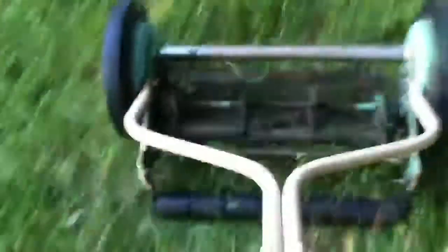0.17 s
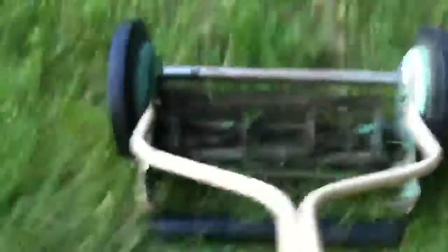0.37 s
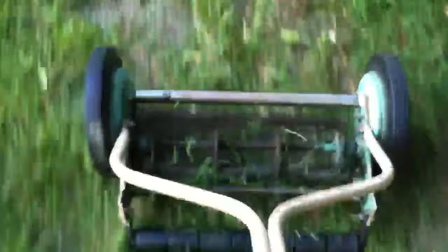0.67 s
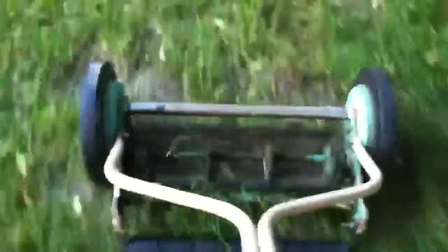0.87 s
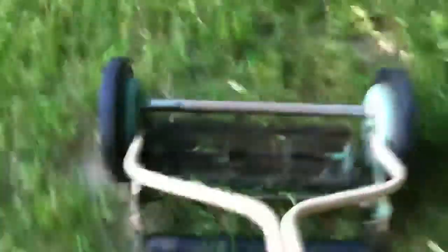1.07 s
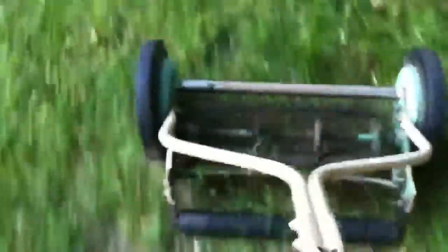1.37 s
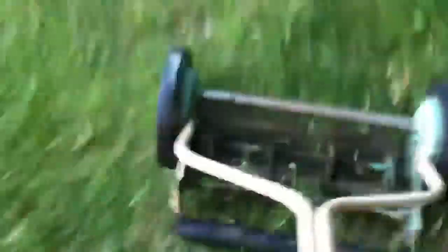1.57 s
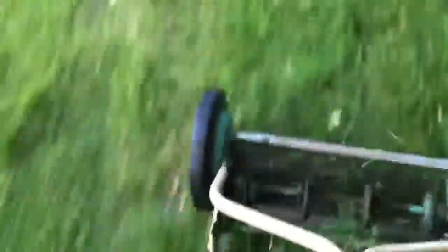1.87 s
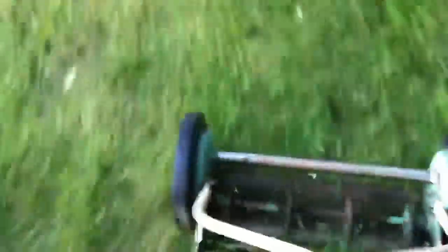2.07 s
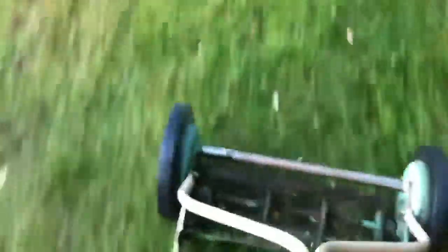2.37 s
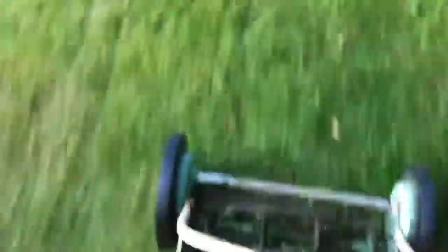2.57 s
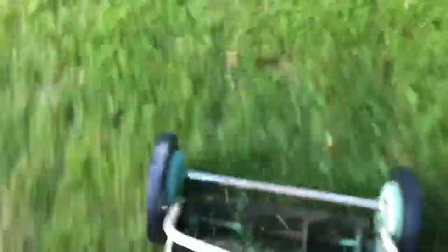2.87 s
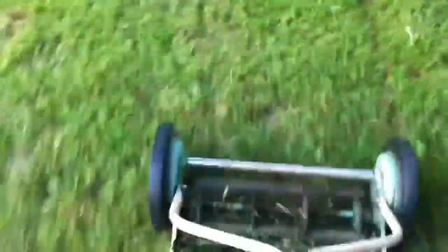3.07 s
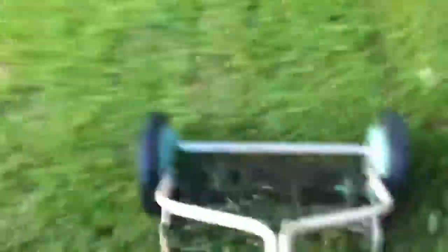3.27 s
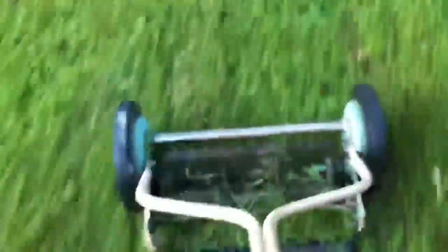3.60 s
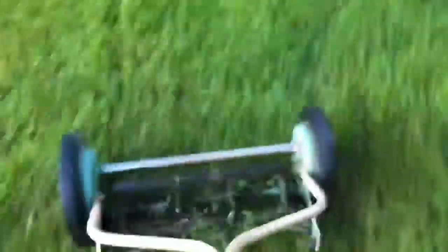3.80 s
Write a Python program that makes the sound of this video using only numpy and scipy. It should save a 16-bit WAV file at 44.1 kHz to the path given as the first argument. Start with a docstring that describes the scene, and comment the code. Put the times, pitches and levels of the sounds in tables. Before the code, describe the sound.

Heard close from the handle outdoors, a push reel mower whirs and rattles through grass in uneven surges. Stalks crackle over a faint wheel rumble, with small knocks throughout and a few loud steel clanks in the second half.

```python
"""A hand reel mower is pushed over a lawn, heard from the handle.
Its spiral blades scrape along a fixed knife in a dense chatter that swells with each push
and sets the frame and the steel ringing. Cut grass crackles and the wheels rumble.
Tufts and bumps knock the chassis, and loose steel parts clank."""
import sys
import numpy as np
from scipy import signal
from scipy.fft import rfft, irfft, next_fast_len
from scipy.io import wavfile
from scipy.ndimage import uniform_filter1d

SR = 44100
rng = np.random.default_rng(int(sys.argv[2]) if len(sys.argv) > 2 else 0)


def pcm_store(signal):
    """Save signal as 16-bit PCM."""
    levels = np.round(np.clip(np.atleast_2d(signal), -1, 1) * 32767)
    wavfile.write(sys.argv[1], SR, levels.astype(np.int16).T)


N = 173754
T = np.arange(N) / SR

# how the mowing swells and eases: t/s, scrape level/dB, crackle level/dB, frame level/dB
SURGES = [(0.0, -33.5, -40, -31), (0.03, -38, -48, -48), (0.08, -41, -39.5, -37.5), (0.12, -35, -39.5, -40),
          (0.25, -43.5, -46.5, -45.5), (0.34, -36.5, -41.5, -37), (0.38, -37.5, -39, -34),
          (0.45, -39, -43.5, -42), (0.51, -45.5, -47.5, -43.5), (0.55, -39, -45.5, -52),
          (0.57, -39.0, -42.5, -39.5), (0.64, -40, -39.5, -35.5), (0.67, -43, -48, -44),
          (0.71, -41, -43.5, -44), (0.75, -37.5, -40, -41.5), (0.83, -39.0, -41, -37.5),
          (0.89, -43.5, -48, -52), (0.91, -43, -43, -45), (0.94, -43, -50, -55), (1.01, -32.5, -35.5, -39),
          (1.07, -36.5, -42.5, -41.5), (1.13, -42, -44.5, -43.5), (1.23, -36.5, -40, -37.5),
          (1.29, -39, -46.5, -46), (1.43, -35.5, -39.5, -34.5), (1.48, -34.5, -38, -43),
          (1.56, -36.5, -38.5, -31.5), (1.62, -28.5, -36.5, -37.5), (1.64, -35, -47, -34.5),
          (1.75, -36.5, -36, -38), (1.83, -35, -39.5, -36.5), (1.91, -36, -37.5, -42.0),
          (1.94, -34.5, -36.5, -33.5), (2.06, -39, -45, -37), (2.09, -31.5, -38, -45),
          (2.13, -28.5, -34, -35), (2.19, -36.5, -41.5, -35), (2.22, -38.5, -46, -46.5),
          (2.29, -31.5, -36.5, -34.5), (2.39, -36.0, -43.5, -41), (2.43, -36.5, -40, -34.5),
          (2.46, -32, -38.5, -39), (2.5, -30, -36, -31.5), (2.57, -35, -38, -39), (2.65, -33.5, -39.5, -43),
          (2.68, -31, -42.5, -37.5), (2.71, -35, -41, -38), (2.78, -33, -36.5, -39),
          (2.83, -37, -43, -33.5), (2.85, -32.5, -29.5, -33.5), (2.96, -34.5, -37, -33),
          (2.99, -35, -40, -40), (3.07, -32.5, -38.5, -34.5), (3.14, -36.5, -40.5, -36.5),
          (3.19, -33.5, -38, -33.5), (3.31, -30, -35.5, -35.5), (3.33, -34.5, -39.5, -36),
          (3.43, -31, -39.5, -37.5), (3.51, -36.5, -41.0, -36.5), (3.59, -32, -38.5, -36),
          (3.67, -34, -40.5, -37.5), (3.77, -34.5, -44.5, -36.5), (3.87, -34, -38.5, -36.5),
          (3.93, -32.5, -39.5, -42.5)]
# tone of the scraping blades: f/Hz, level/dB
SCRAPE_SPECTRUM = [(60, -61), (250, -13.5), (450, -13), (650, -5.5), (950, 1), (1250, 0.5), (1500, 1.5),
                   (2150, 0), (2480, -1.5), (2780, 0), (3500, -7.5), (4600, -12), (5800, -6), (6600, -17),
                   (15000, -23)]
# pitches at which the frame and side plates ring: f/Hz, width/Hz, level/dB
FRAME_RESONANCES = [(738, 17, -7.5), (815, 35, -15), (950, 45, -7), (1017, 20, 1), (1055, 45, -9),
                    (1493, 34, -6), (1580, 50, -11), (1672, 34, -7), (2010, 45, -10), (2130, 50, -12),
                    (2250, 45, -10.5), (2420, 45, -13.5), (2680, 60, -11), (2820, 55, -11)]
# pitches at which the steel rings: f/Hz, level/dB, time to fade by 60 dB/s
STEEL_MODES = [(3731, -6, .12), (5394, -11, .1), (5460, -6, .14), (5512, -7, .11), (5700, -6, .07),
               (5862, -4, .11), (5950, -8, .08), (6040, -9, .08), (7203, -8, .12), (8140, -8, .06),
               (8292, -4, .06), (9227, -1, .07), (10479, -1, .08), (10593, -6, .08), (10878, -2, .11),
               (11890, -5, .05), (13591, -3, .06), (15200, -9, .05), (15560, -5, .05)]
# tone of snapping grass: f/Hz, level/dB
GRASS_SPECTRUM = [(1500, -49), (4000, 2), (6000, 3), (6800, 1), (8000, 2), (9500, 1), (11800, 7),
                  (14000, 3.5), (16000, -1.5)]
# tone of the wheels on turf: f/Hz, level/dB
WHEEL_SPECTRUM = [(25, -6), (55, -14), (80, -9), (100, -1.5), (120, 1.5), (145, 3.5), (300, -9),
                  (500, -1.5), (900, -16.5)]
# pitches at which the handle tubes ring: f/Hz, width/Hz, level/dB
HANDLE_RESONANCES = [(202.8, 14.5, -5.5), (249, 20, -10.5), (397, 60, -7)]
# jolts at tufts and bumps: t/s, level/dB, f/Hz
KNOCKS = [(0.615, -26, 2800.0), (0.903, -35.5, 2760.0), (1.012, -28, 1610.0), (1.037, -25.5, 1570.0),
          (1.224, -28, 1540), (1.337, -29.5, 2480.0), (1.372, -28, 1570.0), (1.41, -27, 1310.0),
          (1.7752, -15, 2050), (1.7839, -24, 1900), (1.898, -28.5, 2020.0), (2.156, -29, 1580),
          (2.346, -24.5, 1820), (2.652, -27, 1760), (2.708, -26, 2090), (2.8358, -16, 2410),
          (3.235, -28, 1830.0), (3.456, -31, 2710.0)]
# tone shared by all knocks: f/Hz, level/dB
KNOCK_SPECTRUM = [(60, -32), (200, -15.5), (450, -9.5), (1000, -1.5), (2000, 1.5), (2700, -0.5),
                  (4200, -5.5), (7000, -16.5), (15000, -26)]
# hits of loose steel: t/s, ring level/dB, crack level/dB, chatter length/s,
# accent f/Hz, accent level/dB (below 0 weakens it), muted f/Hz
CLANKS = [(1.702, -20.5, -17, 0.022, 5570, 7.5, 10700), (1.772, -30, -37, 0.014, 5300, 9, 10700),
          (1.81, -29, -27.5, 0.025, 5590, 14, 14000), (2.0767, -30, -23.5, 0.0069, 7700, -9, 14000),
          (2.5045, -24.5, -20.5, 0.026, 10660, 14.5, 10450), (2.8288, -22.5, -16, 0.011, 11000, 5, 5500),
          (2.834, -20, -23.5, 0.057, 3750, 3, 13600), (3.185, -33.5, -34, 0.084, 3790, 10, 10600),
          (3.872, -34, -30.5, 0.021, 10900, 1, 14000)]
# tone of the crack of steel on steel: f/Hz, level/dB
CRACK_SPECTRUM = [(200, -19), (600, -10), (1000, 3), (2200, 18), (3100, 15.5), (4500, 7), (5800, -9),
                  (6700, 6), (8300, 14.5), (9800, 7), (11700, 17), (14400, 1), (15500, 2)]


def from_db(db):
    """Turn decibels into a factor to multiply by."""
    return 10 ** (np.asarray(db) / 20)


def unit_level(x):
    """Scale a signal so that its average level (rms) is 1."""
    return x / np.sqrt(np.mean(x ** 2) + 1e-20)


def drift(hz):
    """A smooth random wobble of size about 1; more hz makes it quicker."""
    step, warm_up = 40, 2000   # one point every 40 samples; the first points are dropped
    r = np.exp(-2 * np.pi * hz * step / SR)
    noise = rng.standard_normal(N // step + warm_up + 2)
    slow = signal.lfilter([1], [1, -2 * r, r * r], noise)[warm_up:]
    return np.interp(np.arange(N) / step, np.arange(len(slow)), unit_level(slow))


def contacts(per_s, spread_db):
    """Tiny hits at random moments, a few harder than the rest."""
    sizes = from_db(spread_db * np.minimum(rng.exponential(1, N), 5)) * rng.choice([-1, 1], N)
    return unit_level(sizes * (rng.random(N) < per_s / SR))


def colour(x, spectrum):
    """Give a signal the tone in a table; white noise keeps its level."""
    size = 2 * next_fast_len(N)
    hz, db = np.transpose(spectrum)
    grid_hz = np.maximum(np.arange(size // 2 + 1) * SR / size, 1)
    gain = unit_level(from_db(np.interp(np.log(grid_hz), np.log(hz), db)))
    # minimum phase: the filter never sounds before the hit that drives it
    cepstrum = irfft(np.log(gain))
    cepstrum[1:size // 2] *= 2
    cepstrum[size // 2 + 1:] = 0
    return irfft(rfft(x, size) * np.exp(rfft(cepstrum)))[:N]


def ring(x, hz, fade_s):
    """Each click starts a pure tone that falls by 60 dB in fade_s."""
    r, angle = from_db(-60 / (fade_s * SR)), 2 * np.pi * hz / SR
    return signal.lfilter([0, np.sin(angle)], [1, -2 * r * np.cos(angle), r * r], x + 1e-18)


def resonate(x, resonances, wander_db=1.26, wander_hz=13.4):
    """A shaken part rings at several pitches, each driven more or less from moment to moment."""
    out = 0
    for k, (hz, width, db) in enumerate(resonances):
        b, a = signal.iirpeak(hz, hz / width, fs=SR)
        drive = x * from_db(db + wander_db * drift(wander_hz)) / np.sqrt(width)
        out = out + (-1) ** k * signal.lfilter(b, a, drive)
    return unit_level(out)


def dying(start_s, db_per_s):
    """A sudden start, then a steady fade."""
    return (T >= start_s) * from_db(-np.minimum(db_per_s * np.maximum(T - start_s, 0), 200))


def nearness(hz, centre_hz, reach_octaves=0.07):
    """1 at the centre pitch, falling to 0 away from it."""
    return np.exp(-(np.log2(hz / centre_hz) / reach_octaves) ** 2)


def frame_ring(hits, level_db):
    """The frame rings; the contact point travels along the blades and favours changing pitches."""
    return from_db(level_db + 1.5) * resonate(hits, FRAME_RESONANCES)


def knife_ring(hits, level_db, rise_db_per_s=2.5):
    """The scraped steel rings, a little more as the push goes on."""
    tone = sum(from_db(db) * ring(hits, hz, fade_s) for hz, db, fade_s in STEEL_MODES)
    return unit_level(tone) * from_db(level_db - 15.5 + rise_db_per_s * T)


def grass_crackle(level_db):
    """Thousands of stalks snap each second and blend into a bright crackle."""
    snaps = contacts(per_s=7600, spread_db=2.5) * from_db(level_db - 0.5)
    return colour(snaps, GRASS_SPECTRUM)


def reel(pass_hz=52.23, speed_swing=0.1225):
    """Blades pass the fixed knife: they scrape, ring the frame and the steel, and snap the grass."""
    times, *levels = np.transpose(SURGES)
    scrape_db, crackle_db, frame_db = [np.interp(T, times, level) for level in levels]
    passes = np.cumsum(pass_hz * (1 + speed_swing * drift(hz=3.05))) / SR
    bite_db = 2 * signal.sawtooth(2 * np.pi * passes, 0)   # each blade bites, then eases
    judder = np.tanh(drift(hz=25))
    pressure = from_db(bite_db + 2 * judder)
    edge_hits, frame_hits = [pressure * contacts(per_s=1600, spread_db=1.1) for _ in range(2)]
    edge_hits *= from_db(scrape_db)
    scrape = colour(edge_hits, SCRAPE_SPECTRUM)
    frame = frame_ring(frame_hits, frame_db)
    knife = knife_ring(edge_hits, crackle_db)
    grass = grass_crackle(crackle_db + bite_db + 3.5 * judder)
    return scrape + frame + knife + grass


def wheels(rumble_db=-50.5, fade_db_per_s=1.73, handle_db=-57):
    """The wheels shake the handle and rumble on the turf; the rumble slowly fades."""
    turf, shake = rng.standard_normal((2, N))
    rumble = from_db(rumble_db - fade_db_per_s * T) * colour(turf, WHEEL_SPECTRUM)
    return rumble + from_db(handle_db) * resonate(shake, HANDLE_RESONANCES)


def knocks(fade_s=0.058, unpitched_db=-4.5):
    """A tough tuft or a bump jolts the chassis: a short crunch with a pitch of its own."""
    grit, out = contacts(per_s=9000, spread_db=1.0), 0
    for start_s, db, hz in KNOCKS:
        force = from_db(db) * dying(start_s, 60 / fade_s) * grit
        pitched = signal.lfilter(*signal.iirpeak(hz, Q=3.8, fs=SR), force)
        out = out + from_db(unpitched_db) * force + pitched
    return colour(out, KNOCK_SPECTRUM)


def clanks(strike_db=14, muted_db=-13):
    """Loose steel strikes, chatters and settles; where it is hit makes pitches stronger or weaker."""
    rings, cracks = np.zeros(N), np.zeros(N)
    for start_s, ring_db, crack_db, length_s, accent_hz, accent_db, muted_hz in CLANKS:
        first = int(start_s * SR)
        span = slice(first, first + SR // 2)
        settling = dying(start_s, 9 / length_s) * (T < start_s + length_s)   # falls 9 dB, then stops
        chatter = (contacts(per_s=2500, spread_db=2.8) * settling)[span]
        chatter[0] += from_db(strike_db)   # the first blow
        tone = 0
        for hz, db, fade_s in STEEL_MODES:
            mode = ring(chatter, hz, fade_s) * rng.choice([-1, 1])
            place_db = accent_db * nearness(hz, accent_hz) + muted_db * nearness(hz, muted_hz)
            tone = tone + from_db(db + place_db) * mode / np.abs(mode).max()
        loudest = np.sqrt(uniform_filter1d(tone ** 2, size=500).max())
        rings[span] += from_db(ring_db) * tone / loudest
        grit = contacts(per_s=13000, spread_db=1.0)
        cracks += from_db(crack_db) * grit * dying(start_s, 17.5 / length_s)
    return rings + colour(cracks, CRACK_SPECTRUM)


def scene():
    """The whole mower, close by in open air, in one channel."""
    return (reel() + wheels() + knocks() + clanks())[None]


def record(dry, low_cut_hz=60, high_cut_hz=15850):
    """A small microphone loses the deep bass; the highest treble is cut steeply."""
    bass_cut = signal.butter(3, low_cut_hz, "high", fs=SR, output="sos")
    treble_cut = signal.ellip(12, .1, 80, high_cut_hz, fs=SR, output="sos")
    return signal.sosfilt(treble_cut, signal.sosfilt(bass_cut, dry))


dry = scene()
out = record(dry)
pcm_store(out)
```